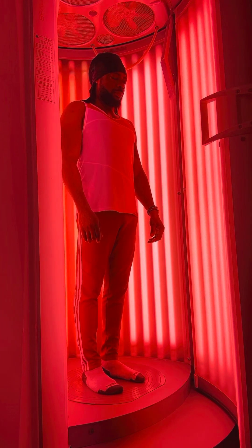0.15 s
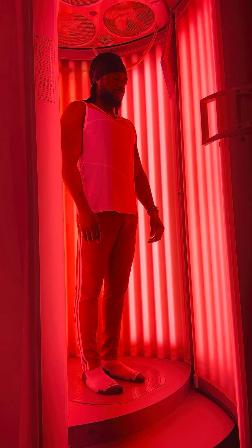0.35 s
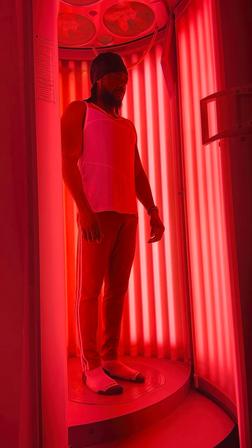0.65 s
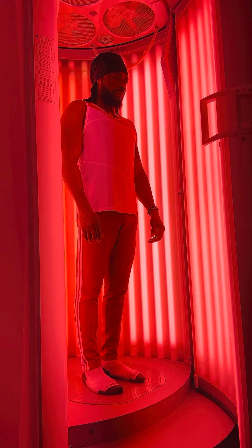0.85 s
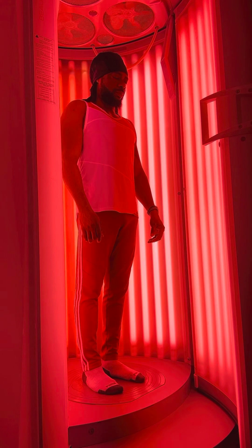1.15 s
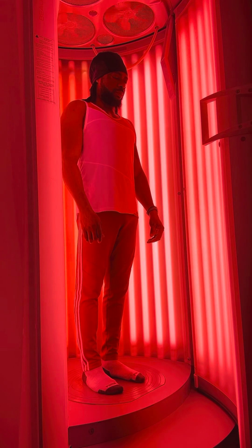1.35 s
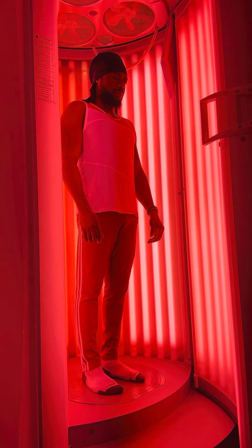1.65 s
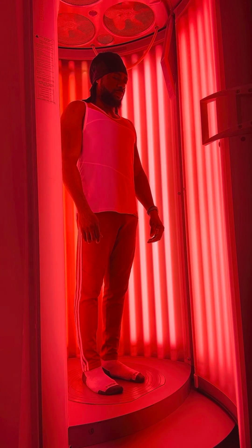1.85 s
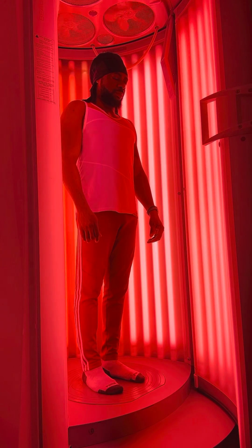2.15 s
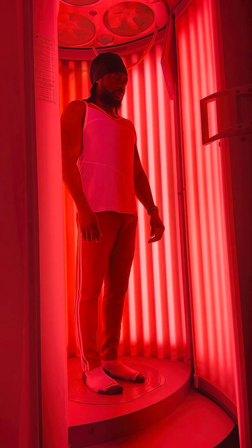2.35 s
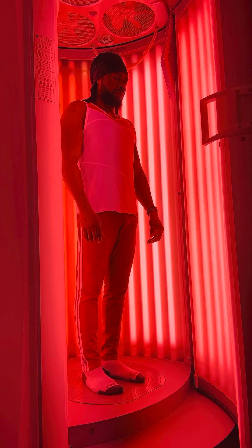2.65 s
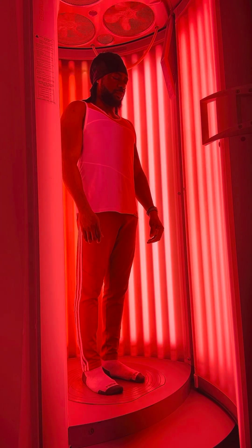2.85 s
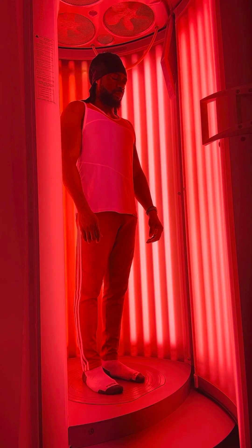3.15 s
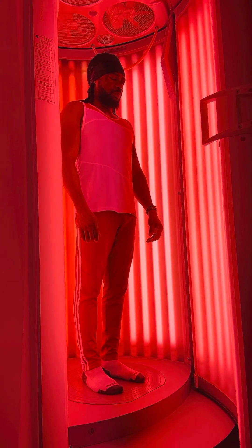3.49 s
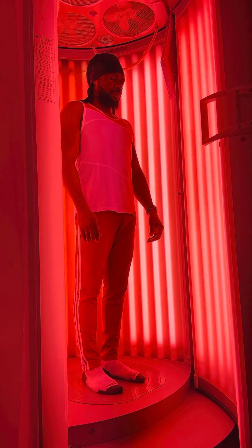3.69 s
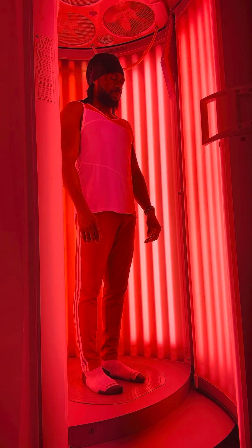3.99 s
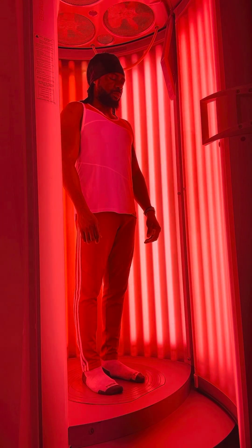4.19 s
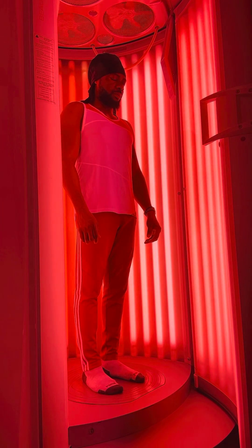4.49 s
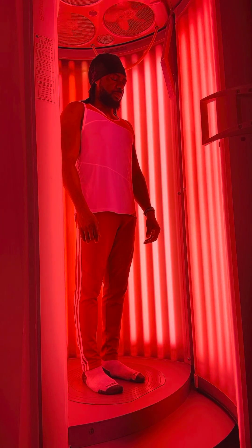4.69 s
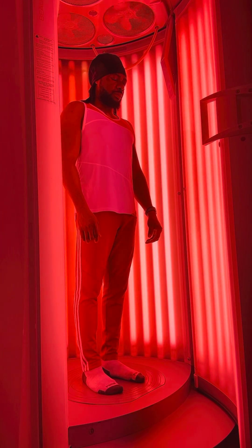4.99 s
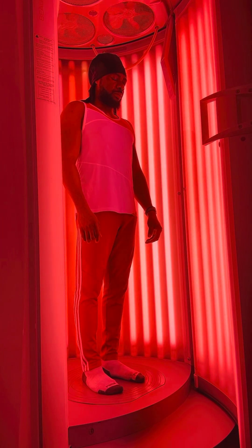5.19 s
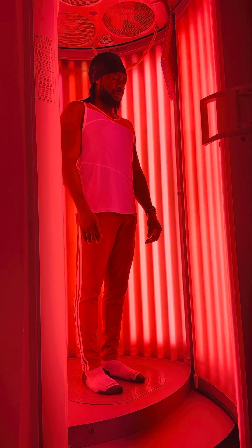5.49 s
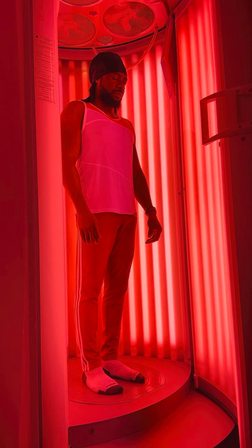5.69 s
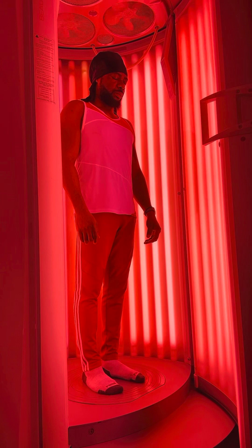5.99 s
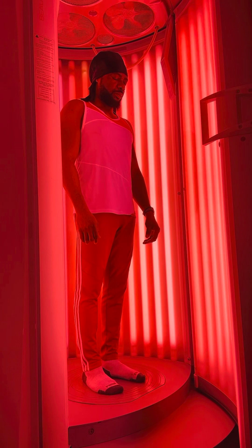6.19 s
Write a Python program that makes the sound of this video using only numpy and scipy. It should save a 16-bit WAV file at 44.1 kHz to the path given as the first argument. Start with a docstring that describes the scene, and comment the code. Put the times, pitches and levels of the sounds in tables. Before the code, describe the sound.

A steady indoor fan drone runs from start to end without starting or stopping. Broad low rushing air resonates in a hollow booth, its middle fluttering finely. Underneath, electrical hum and fan tones merge and throb slowly, strongest after about a second. Soft high hiss rises in small puffs, and a barely audible thin whine stays very high. Close, wide stereo microphone, short reflections.

```python
"""Air rushing from three cooling fans in a booth roof rings the hollow booth, heard at two microphone ports.
The rush is noise, coloured by resonances and echoes; its middle flutters in bands and its top hiss swells.
The blade tones of the fans are sines at slightly different rates that beat slowly over a mains hum.
A low shake wavers beneath, and a thin steady whine holds far up in the treble."""
import sys
import numpy as np
from scipy import signal
from scipy.fft import rfft, irfft, next_fast_len
from scipy.io import wavfile
from scipy.ndimage import uniform_filter1d

SR = 44100
rng = np.random.default_rng(int(sys.argv[2]) if len(sys.argv) > 2 else 0)


def transcribe(signal):
    """Save signal, clipped to [-1, 1], as a 16-bit WAV file at the path in sys.argv[1]."""
    frames = np.atleast_2d(signal).T
    limited = np.clip(frames, -1, 1)
    pcm = np.round(limited * 32767).astype(np.int16)
    wavfile.write(sys.argv[1], SR, pcm)


N = 279594
SIZE = next_fast_len(N)  # transform length
HZ = np.maximum(np.arange(SIZE // 2 + 1) * SR / SIZE, 1.)  # frequency of each bin
TIME = np.arange(N) / SR
IN_STEP_S = 1.32  # moment at which the blade fundamentals of all fans and the hum crest together


def undb(db):
    """Decibels to gain."""
    return 10 ** (np.asarray(db) / 20)


def over_hz(table):
    """Columns of a table, interpolated on a log-frequency axis given by its first column."""
    hz, *columns = np.transpose(table)
    return np.array([np.interp(np.log(HZ), np.log(hz), column) for column in columns])


def walk(rate):
    """Smooth random drift: levels held 1 / rate seconds and slewed twice; spread near 1."""
    hold = int(SR / rate)
    held = np.repeat(rng.standard_normal(N // hold + 1), hold)
    slewed = uniform_filter1d(uniform_filter1d(held, hold), hold)
    return 1.3 * slewed[:N]  # restores the spread lost in smoothing


def tone(turns, db):
    """A sine of given rms level on each channel; its phase is counted in turns."""
    return np.sqrt(2) * undb(np.reshape(db, (-1, 1))) * np.cos(2 * np.pi * turns)


def mains_hum():
    """Magnetic hum: steady multiples of twice the mains rate, all cresting together."""
    # Each row: multiple of the base rate, left rms level in dB, right rms level in dB.
    hum_levels = [(1, -38.5, -37.5), (3, -56, -56), (4, -48, -47.5), (13, -59, -68), (14, -62, -70)]
    base_hz = 120.015
    turns = base_hz * (TIME - IN_STEP_S)
    return sum(tone(round(multiple) * turns, db) for multiple, *db in hum_levels)


def casing_shake():
    """A low shake of the casing, a sine whose level and phase wander slowly."""
    shake_hz, middle_db = 51.75, -45.5
    level = undb(1.5 * walk(2.0))
    turns = shake_hz * TIME + .05 * walk(1.5)
    return level * tone(turns, middle_db)


def whine():
    """A steady electric whine, a pure sine in opposite phase at the two ports."""
    whine_hz, level_db = 15030.3, -72.5
    return tone(whine_hz * TIME, level_db) * np.array([[1], [-1]])


def fans():
    """Each fan sounds the multiples of its blade rate; the rates differ a little, so they beat."""
    # Each row: multiple of the blade rate, then left and right rms level in dB for fans one, two and three.
    blade_levels = [(1, -34, -33, -37, -37, -52, -52), (2, -53, -47, -58, -51, -49, -44),
                    (3, -54, -56, -47, -43, -49, -44), (4, -52, -51, -51, -58, -70, -66),
                    (5, -54, -52, -46, -44, -70, -68), (6, -57, -68, -54, -66, -68, -67)]
    blade_hz = (130.8, 131.31, 132.24)  # mean blade rate of each fan
    out = 0
    for fan, hz in enumerate(blade_hz):
        # gusts make the rotor run slightly ahead of or behind its mean speed
        turns = hz * (TIME - IN_STEP_S) + .015 * walk(1.5)
        for multiple, *db in blade_levels:
            start = rng.random() if multiple > 1 else 0
            out = out + tone(round(multiple) * turns + start, db[2 * fan:2 * fan + 2])
    return out


def echoes():
    """A decaying tail of reflections behind the direct sound combs the spectrum into fine peaks and dips."""
    echo_db, t60_s = -13, .2  # greatest level against the direct sound, time to fall 60 dB
    low_hz, high_hz = 900, 6000  # band in which the ripple is heard
    age_s = np.arange(SR // 2) / SR
    tail = rng.standard_normal(SR // 2) * undb(-60 * age_s / t60_s)
    tail = tail / np.sqrt(np.sum(tail ** 2))
    share = undb(echo_db) / np.sqrt((1 + (low_hz / HZ) ** 8) * (1 + (HZ / high_hz) ** 2))
    # the division keeps the mean power unchanged
    return (1 + share * rfft(tail, SIZE)) / np.sqrt(1 + share ** 2)


def air_colour():
    """Spectrum of the rush at each port: a broad slope, raised or dipped in power by the resonances."""
    # Rushing air before resonance. Each row: frequency in Hz, left level in dB per Hz, right level in dB per Hz.
    slope = [(22.0, -80, -79), (40.0, -66.5, -66.5), (47, -61, -61), (65.4, -53.0, -51.5),
             (151, -50, -50.5), (222, -54, -52.5), (337, -55, -53), (566, -57, -57), (740, -59.5, -62.5),
             (1110, -64, -66), (1865, -62.5, -71.5), (2660, -72.5, -72.5), (4100, -77.5, -82.5),
             (8050, -91, -92), (12000.0, -100.0, -100.0), (14200.0, -100, -92)]
    # Resonances of booth and room. Each row: centre in Hz, width in Hz, left lift in dB, right lift in dB.
    resonances = [(51.5, 7, 8.5, 8.5), (59, 7, -2.5, -2), (71.4, 18, -2.5, -3), (84.4, 8.8, 4.5, 4),
                  (97.2, 17, 7.5, 8.5), (119, 11, 3, 4), (126, 6, 1, 1), (135, 8, 2.5, 3),
                  (143, 10, 3, 3.5), (152, 8, -3.5, -3), (164, 24, -4, -3.5), (170, 6, -1.5, -2),
                  (178.7, 12, 6.5, 7.5), (188, 20, 6.5, 7), (194, 8, 1.5, 0.5), (221, 20, -3.5, -2.5),
                  (231, 9.3, 1, 2), (252, 16, 6, 6), (270, 14, 5.5, 8), (302, 24, 2, 3.5),
                  (332, 12, -3, -7.5), (355, 22, 4.5, 3.5), (367, 8, 0, -2), (380, 9, 3.5, 3),
                  (393, 8, -2, -2), (401, 12, 8, 7.5), (420, 10, -4, 2.5), (434, 16, 3, 3),
                  (454, 18, 1, 5.5), (467, 13, -6, -6), (484.3, 10, 7, 3.5), (514, 10, -3, -3),
                  (532, 8, -3, -2), (541, 11, 1, 3.5), (560, 9.1, -1.5, 4.5), (577, 18, -5, -5),
                  (611, 30, 5.5, 7), (632.7, 20, 8.5, 8), (645, 8, -2, -2), (657, 9, 2, 2),
                  (667, 9, -2, -3), (680, 14, -0.5, 5), (706, 12, -5, -1), (735, 20, 2, 1), (768, 18, 4, 4),
                  (779, 8, -3, -2), (810, 8, -4, -2), (826.5, 24, 4.5, 6), (1080, 80, 0, -2.5),
                  (1186, 22, 2, 1.5), (1280, 98, -0.5, -3), (1401, 54, 4, 1), (1498, 130, 3, 4),
                  (1660, 91, 0.5, -3), (1790, 100, 1, 3.5), (1940, 20, 0, 3.5), (1964, 29, 2.5, 1.5),
                  (2150, 60, 2.5, 0), (4060, 720, 2, 3), (7900, 500, 0.5, -1.5), (10300, 1500, 0, 3.5),
                  (15500, 1400, -1.5, -5.5)]
    power = 1
    for hz, width, left_db, right_db in resonances:
        lift = undb([[left_db], [right_db]]) ** 2 - 1
        power = power + lift / (1 + (2 * (HZ - hz) / width) ** 2) ** 2
    # SR / 2 turns the level per Hz into a gain on unit white noise
    return undb(over_hz(slope)) * np.sqrt(np.maximum(power, .01) * SR / 2)


def port_noise():
    """Turbulence at two ports: a shared noise, delayed in phase on the right, and a part of the right's own."""
    # Each row: frequency in Hz, likeness of the ports from 0 to 1, phase lead of the left port in radians.
    ports = [(100.0, 1.0, 0.0), (250.0, 0.95, 0.14), (450.0, 0.77, 0.07), (650.0, 0.47, -0.17),
             (900.0, 0.33, 0.37), (1200.0, 0.28, 1.36), (1500.0, 0.51, 0.24), (1900.0, 0.63, -1.91),
             (2300.0, 0.58, -3.04), (2800.0, 0.46, -3.54), (3300.0, 0.46, -4.2), (4200.0, 0.54, -3.93),
             (5200.0, 0.6, -3.49), (6200.0, 0.83, -3.15)]
    likeness, lead = over_hz(ports)
    likeness = np.clip(likeness, 0, 1)
    shared, own = rfft(rng.standard_normal((2, SIZE)))
    right = likeness * np.exp(-1j * lead) * shared + np.sqrt(1 - likeness ** 2) * own
    return np.array([shared, right])


def hiss_swell():
    """Gain of the highest hiss: drawn swells with a slower waver and a quicker flicker of random unrest."""
    # Each row: time in seconds, hiss level in dB before the random unrest.
    hiss_levels = [(0.0, -1.5), (1.43, -0.5), (1.68, 3), (1.9, -1), (2.27, -0.5), (2.38, 5), (2.52, -1),
                   (2.83, 2.5), (3.0, -1), (3.62, -1.5), (4.0, -3), (4.8, -3.5), (5.15, 0.5), (5.5, -2),
                   (5.97, 2), (6.34, 0)]
    drawn_db = np.interp(TIME, *np.transpose(hiss_levels))
    waver_db, flicker_db = 0.8 * walk(9.0), 0.3 * walk(30)
    return undb(drawn_db + waver_db + flicker_db)


def air():
    """Turbulence coloured by booth and echoes; narrow middle bands flutter singly and the top swells."""
    swell_from_hz, swell_full_hz = 6500, 12500
    flutter_hz = 1300 * 2 ** np.arange(0, 2.4, 1 / 6)  # band centres, six to the octave
    flutter_octaves, flutter_db, flutter_per_s = .11, 1.2, 32  # band half-width, spread, changes per second
    rush = air_colour() * echoes() * port_noise()
    # the higher the band, the more of it follows the swell
    top = np.clip((HZ - swell_from_hz) / (swell_full_hz - swell_from_hz), 0, 1)
    body = irfft(rush * (1 - top), SIZE)[:, :N]
    hiss = irfft(rush * top, SIZE)[:, :N]
    for hz in flutter_hz:
        band = np.exp(-(np.log2(HZ / hz) / flutter_octaves) ** 2)
        change = undb(flutter_db * walk(flutter_per_s)) - 1
        body = body + change * irfft(rush * band, SIZE)[:, :N]
    return body + hiss_swell() * hiss


def scene():
    """All sources summed at the two ports."""
    return mains_hum() + casing_shake() + whine() + fans() + air()


def record(dry):
    """High treble is kept only in opposite phase on the two channels; the very top is cut."""
    shared_top_hz, top_hz = 6300, 15720
    mid, side = (dry[0] + dry[1]) / 2, (dry[0] - dry[1]) / 2
    shared_cut = signal.ellip(8, .1, 40, shared_top_hz, fs=SR, output="sos")
    mid = signal.sosfiltfilt(shared_cut, mid)
    wide = np.array([mid + side, mid - side])
    top_cut = signal.ellip(10, .1, 40, top_hz, fs=SR, output="sos")
    return signal.sosfiltfilt(top_cut, wide)


dry = scene()
out = record(dry)
transcribe(out)
```